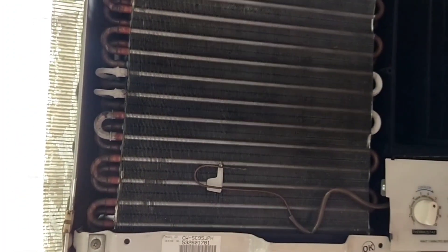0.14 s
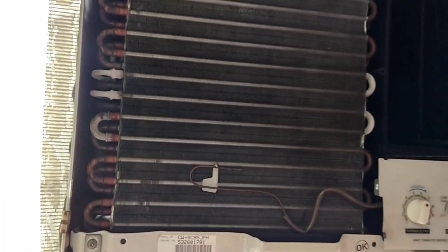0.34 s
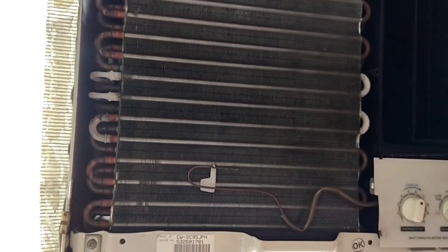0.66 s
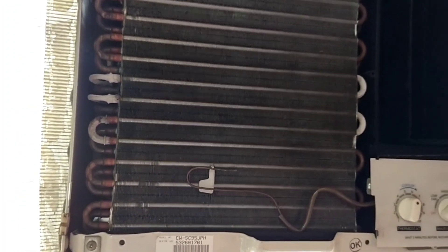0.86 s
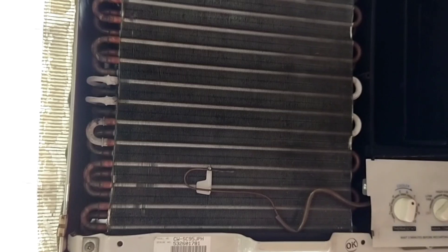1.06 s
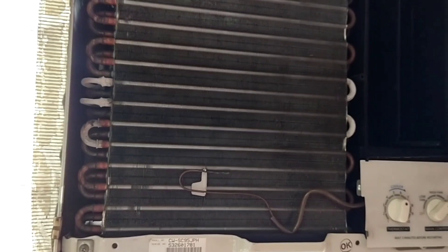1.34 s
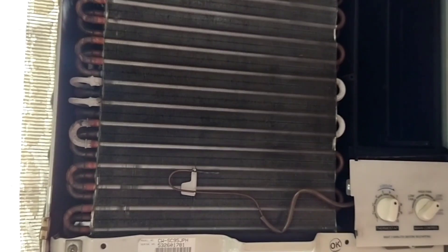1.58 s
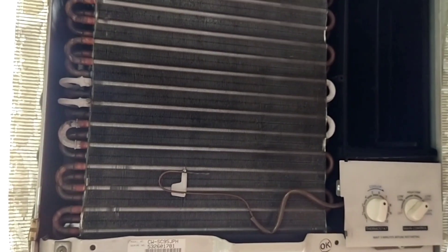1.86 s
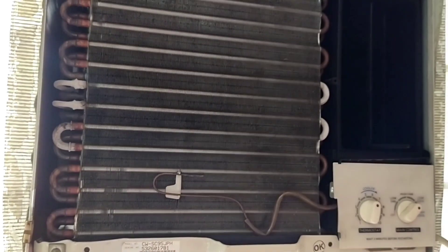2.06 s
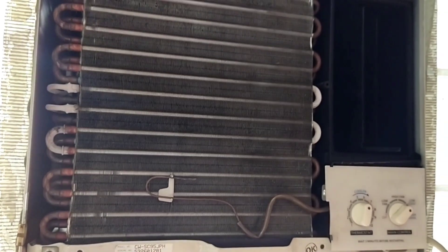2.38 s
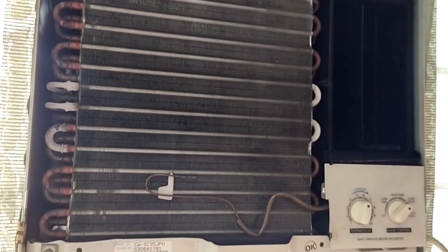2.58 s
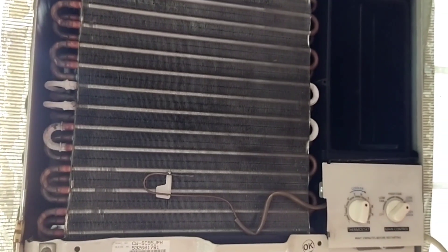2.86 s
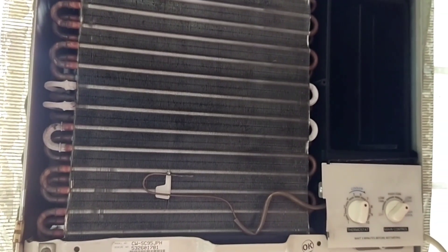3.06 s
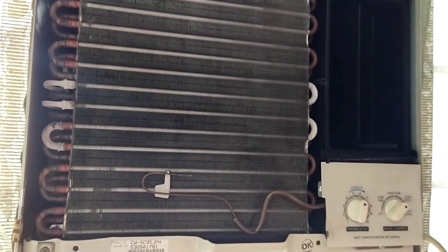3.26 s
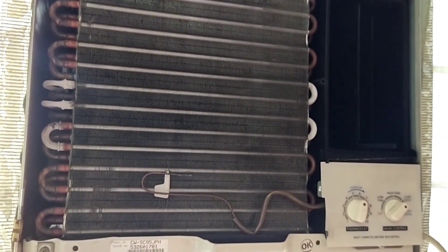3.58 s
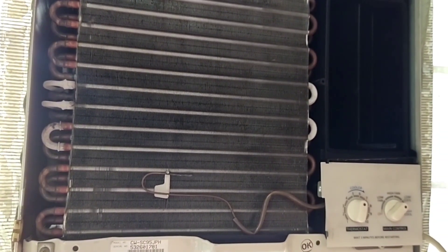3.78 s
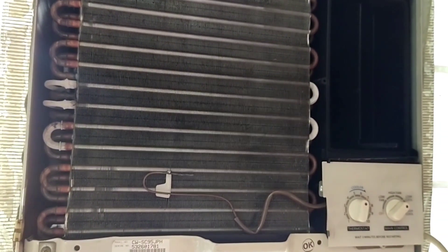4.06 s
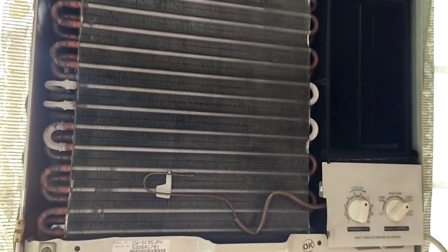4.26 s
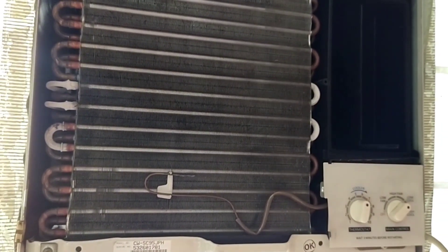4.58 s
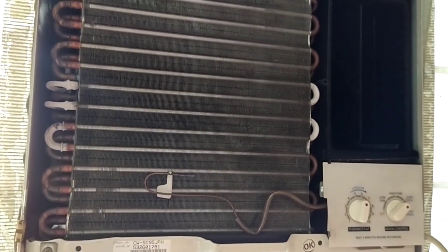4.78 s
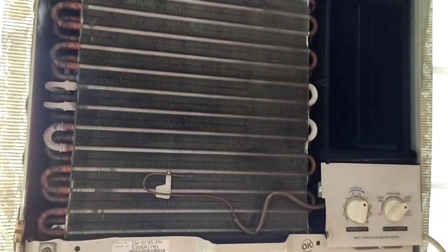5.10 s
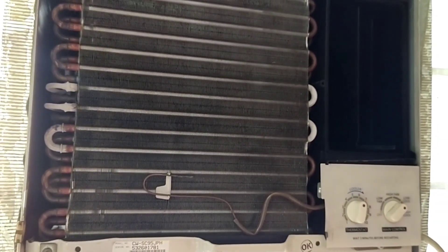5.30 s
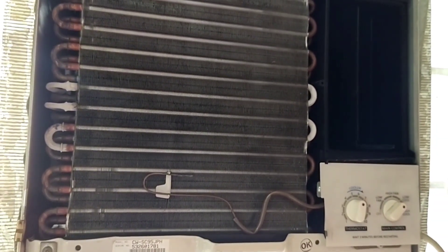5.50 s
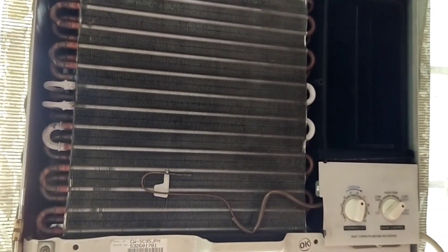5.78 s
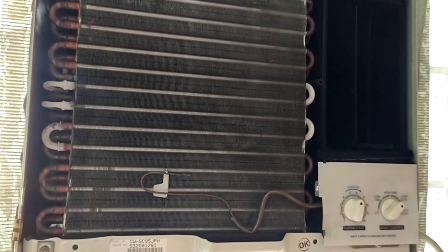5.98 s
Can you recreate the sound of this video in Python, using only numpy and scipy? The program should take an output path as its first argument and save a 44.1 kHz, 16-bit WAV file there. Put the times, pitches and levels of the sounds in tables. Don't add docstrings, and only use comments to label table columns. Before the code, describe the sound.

A window air conditioner hums close by, its low compressor drone pulsing about three times a second under airy fan roar, with a few small ticks.

```python
import sys
import numpy as np
from scipy import signal
from scipy.fft import irfft, next_fast_len
from scipy.io import wavfile
from scipy.ndimage import uniform_filter1d

SR = 44100
rng = np.random.default_rng(int(sys.argv[2]) if len(sys.argv) > 2 else 0)


def generate_wav(sig):
    pcm = np.round(np.clip(np.atleast_2d(sig).T, -1, 1) * 32767).astype(np.int16)
    wavfile.write(sys.argv[1], SR, pcm)


def voltage_ratio(decibels):
    exponent = np.asarray(decibels, float) / 20
    return 10 ** exponent


N = 270789

MAINS_HZ, FAN_HZ = 119.68, 14.89
FIRST_DIP_S = 0.083
TOP_MULTIPLE = 30
FAINT_DB, FAINT_DB_PER_MULTIPLE, FAINT_SCATTER_DB = -78, -.25, 3
RIGHT_PANEL, RIGHT_PANEL_LAG_S = (4, 5), .00045
ROCKING_PANEL, OPPOSED_RAD = (7, 24, 25, 28), 2.2
SCATTER_RAD_PER_MULTIPLE = .02
MASK_FROM_HZ, MASK_DB, MASK_DB_PER_OCTAVE = 2000, 7.5, -2.3
EDGE_HZ = 15520

# (time [s], shaft speed [Hz])
SHAFT_SPEED = [(0, 58.312), (6.14, 58.25)]
# (multiple of the shaft [1], left level [dB], right level [dB])
SHELL_TONES = [(1, -62.5, -61.2), (2, -48.8, -48.1), (3, -55, -56.5), (4, -48.2, -49.7), (5, -73.0, -70.5),
               (6, -66.7, -64.6), (7, -73.8, -75.7), (8, -64.2, -61.9), (9, -62.4, -60.1),
               (10, -69.2, -70.3), (12, -70.3, -73.1), (13, -65.2, -76.0), (14, -80.6, -72.7),
               (17, -76.7, -76.4), (18, -75, -70.2), (24, -69.2, -74.7), (25, -71.9, -79.8),
               (26, -68.3, -76.9), (27, -84.4, -77.2), (28, -76.2, -82.8)]
# (multiple of the hum [1], level [dB])
MAINS_HUM = [(1, -49.3), (2, -62)]
# (multiple of the fan shaft [1], level [dB])
BLADE_TONES = [(5, -67.5), (9, -59), (13.655, -66), (13.742, -68)]
# (shell multiple [1], level [dB])
ROCKING_TONES = [(2, -68), (3, -69), (5, -74), (7, -75), (9, -75), (11, -73)]
# (shell multiple [1], times the mains hum added [1], level [dB])
SLIP_TONES = [(6, 1, -72), (10, -1, -75)]
# (share of a turn [1], level [dB])
VALVE_CLICKS = [
    (.27, -81),
    (.77, -67),
    (0.963, -80),
]
# (frequency [Hz], density [dB per Hz])
ROAR_SPECTRUM = [(20, -100), (60, -95), (80, -80), (110, -78), (230, -77.5), (310, -84.5), (332, -88.5),
                 (360, -81.5), (700, -86), (880, -90.5), (1120, -87.5), (1300, -92.5), (1800, -95),
                 (3000, -115)]
# (frequency [Hz], width [Hz], density [dB per Hz])
PANEL_MODES = [(114, 12, -77), (128, 20, -72), (168, 16, -76), (204, 14, -74), (240, 20, -78),
               (280, 20, -79), (435, 20, -78), (468, 18, -75), (522, 26, -78), (580, 16, -79),
               (650, 30, -81.5), (757, 30, -84), (815, 18, -84), (975, 20, -88)]
# (frequency [Hz], left-right likeness [1])
LIKENESS = [(60, .96), (150, .965), (210, .96), (330, .84), (500, .94), (770, .66), (1170, .14), (1800, 0)]
# (frequency [Hz], left over right [dB])
BALANCE = [(60, -1), (140, 0), (220, 1), (360, -2.5), (520, -2.5), (750, 1), (870, -3), (1150, 1.5),
           (1800, 0)]
# (frequency [Hz], lead of the left microphone [rad])
LEFT_PHASE = [(100, 0), (170, -.05), (290, -.2), (350, .1), (470, -.2), (650, .1), (760, -.35), (1000, -.6)]
# (frequency [Hz], left density [dB per Hz], right density [dB per Hz])
FIN_HISS = [(1500, -107, -107), (2200, -95.5, -94.5), (2700, -97.5, -98), (3200, -101.5, -101),
            (3900, -102.5, -103.5), (4300, -99, -103), (4700, -100, -107.5), (5400, -104, -113),
            (5900, -107.5, -113), (6300, -104.5, -108.5), (7000, -102.5, -107), (7400, -102, -108),
            (8200, -104.5, -114), (10400, -108.5, -117.5), (11700, -113.5, -117), (12300, -112, -118),
            (14400, -116, -120.5), (15500, -112, -131)]
# (time [s], hiss level [dB])
FIN_NEARNESS = [(0, 1.2), (1.4, 1), (2.5, .3), (5.2, -.7), (6.14, -.5)]
# (time [s], share turned away [1])
TURNING = [(0, -.5), (2.15, -.4), (2.3, .8), (3.5, 1), (4.7, 0), (5.1, 1), (5.6, .7), (6.14, .3)]
# (frequency [Hz], level [dB])
TURNED_LOSS = [(8000, 0), (12000, -2), (15500, -2.5)]
# (multiple [1], left level [dB], right level [dB])
SINGING_TONES = [(21, -77, -82), (29, -80, -80), (41, -85, -85), (63, -84, -82), (69, -87, -91),
                 (71, -89, -87), (72, -87, -91), (74, -85, -92), (75, -85, -89), (76, -82.5, -86),
                 (83, -89, -94), (80, -88.5, -95), (90, -89.5, -97), (116, -92, -93), (126, -88, -95),
                 (133, -87.5, -96), (134, -88, -96)]
# (start [s], end [s], frequency [Hz], width [Hz], level [dB])
WHISTLE_MODES = [
    (-.8, 1.3, 4320, 70, -77),
    (-.6, 2.1, 7820, 180, -76),
    (5.5, 6.3, 8550, 150, -83),
]
# (time [s], peak level [dB], brightness [Hz], left over right [dB])
TICK_EVENTS = [
    (1.06862, -26.6, 1150, 33),
    (2.1302, -48.5, 9500, 10),
    (2.75, -56, 7500, 6),
    (4.705, -58, 8800, 6),
    (5.703, -59, 10300, 10),
    (5.72, -58, 10300, 10),
    (6.06, -58, 10000, 8),
    (6.0953, -47.5, 9000, 16),
]
# (start [s], end [s], low edge [Hz], high edge [Hz], left level [dB], right level [dB])
HAND_RUB = (2.71, 2.85, 3500, 9000, -67.5, -70)


def read(points, hz):
    f, value = np.transpose(points)
    return np.interp(np.log(hz + 1), np.log(f + 1), value)


def curve(points):
    return np.interp(np.arange(N) / SR, *np.transpose(points))


def evened(x):
    return x / np.sqrt(np.mean(x ** 2))


def drift(hz, depth_db):
    knots = evened(uniform_filter1d(rng.standard_normal(200), size=4))
    return np.interp(np.arange(N) / SR * hz * 4, np.arange(200), voltage_ratio(depth_db * knots))


def swelling(start, end, t):
    return np.sin(np.pi * np.clip((t - start) / (end - start), 0, 1))


def resonance(x, hz, q):
    return signal.lfilter(*signal.iirpeak(hz, q, SR), x)


def tone(turns, db, waver_db):
    return np.sqrt(2) * voltage_ratio(db) * drift(1.18, waver_db) * np.cos(2 * np.pi * turns)


def noise(left_db, right_db, same, left_lead=0):
    size = next_fast_len(N)
    a, b, c, d = rng.standard_normal((4, size // 2 + 1))
    left = a + 1j * b
    right = same * left * np.exp(-1j * left_lead) + np.sqrt(1 - same ** 2) * (c + 1j * d)
    spectra = np.array([left * voltage_ratio(left_db), right * voltage_ratio(right_db)])
    return irfft(spectra * np.sqrt(size * SR / 4), size)[:, :N]


def compressor(turns):
    out, turn, power = np.zeros((2, N)), np.exp(2j * np.pi * turns), 1
    strong = {k: (left_db, right_db) for k, left_db, right_db in SHELL_TONES}
    for k, chance in enumerate(rng.standard_normal((TOP_MULTIPLE, 3)), 1):
        power = power * turn
        faint_db = FAINT_DB + FAINT_DB_PER_MULTIPLE * k + FAINT_SCATTER_DB * chance[:2]
        db = strong.get(k, faint_db)
        lead = SCATTER_RAD_PER_MULTIPLE * k * chance[2] + OPPOSED_RAD * (k in ROCKING_PANEL)
        lead -= 2 * np.pi * k * SHAFT_SPEED[0][1] * RIGHT_PANEL_LAG_S * (k in RIGHT_PANEL)
        start = 2 * np.pi * rng.random() * (k != 2)
        phase = start + lead * np.array([[.5], [-.5]])
        sides = voltage_ratio(np.reshape(db, (2, 1))) * np.exp(1j * phase)
        out += np.sqrt(2) * drift(1.0, .5 + .03 * k) * (sides * power).real
    return out


def motors(turns):
    t = np.arange(N) / SR
    dip = round(FIRST_DIP_S * SR)
    mains = MAINS_HZ * (t - t[dip]) + 2 * turns[dip] + .5
    fan = FAN_HZ * t + .03 * drift(.6, 1.0)
    hum = sum(tone(k * mains, db, 1.3) for k, db in MAINS_HUM)
    blades = sum(tone(k * fan + rng.random(), db, 2.0) for k, db in BLADE_TONES)
    rocking = sum(tone(k * turns + fan + rng.random(), db, 1.6) for k, db in ROCKING_TONES)
    return hum + blades + rocking


def slip(turns):
    mains = MAINS_HZ * np.arange(N) / SR
    return sum(tone(k * turns + side * mains + rng.random(), db, 1.4) for k, side, db in SLIP_TONES)


def valves(turns):
    out, t = np.zeros((2, N)), np.arange(500) / SR
    for share, db in VALVE_CLICKS:
        at = np.flatnonzero(np.diff(np.floor(turns - share)) > 0)
        clicks = np.zeros(N)
        clicks[at] = voltage_ratio(db + 2.7 * rng.standard_normal(400)[:len(at)])
        modes = rng.standard_normal((2, 500)) * voltage_ratio(-60 * t / .012)
        ring = resonance(resonance(modes, 4400, 3.0), 4300, 4.0)
        ring += .4 * resonance(modes, 7400, 6.0)
        out += signal.oaconvolve(clicks[None], ring * voltage_ratio([[16.5], [12]]), axes=1)[:, :N]
    return out


def roar():
    hz = np.fft.rfftfreq(next_fast_len(N), 1 / SR)
    power = voltage_ratio(read(ROAR_SPECTRUM, hz)) ** 2
    for mode_hz, width, db in PANEL_MODES:
        power = power + voltage_ratio(db) ** 2 / (1 + (2 * (hz - mode_hz) / width) ** 2) ** 2
    db, tilt_db = 10 * np.log10(power), read(BALANCE, hz) / 2
    return noise(db + tilt_db, db - tilt_db, read(LIKENESS, hz), read(LEFT_PHASE, hz))


def hiss(turns):
    hz, table = np.fft.rfftfreq(next_fast_len(N), 1 / SR), np.array(FIN_HISS)
    below_db = -40 * np.log10(1 + (900 / (hz + 1)) ** 2)
    air = noise(read(table[:, [0, 1]], hz) + below_db, read(table[:, [0, 2]], hz) + below_db, 0)
    z = signal.stft(air, nperseg=512, noverlap=384)[2]
    patches = uniform_filter1d(rng.standard_normal(z.shape), size=30, axis=2)
    patches = evened(uniform_filter1d(patches, size=5, axis=1))
    gusts = evened(uniform_filter1d(rng.standard_normal(z.shape[2]), size=6))
    turned = np.interp(np.arange(z.shape[2]) * 128 / SR, *np.transpose(TURNING))
    far_db = read(TURNED_LOSS, np.fft.rfftfreq(512, 1 / SR))[:, None] * turned
    z = z * voltage_ratio(1.6 * patches + .6 * gusts + far_db)
    air = signal.istft(z, nperseg=512, noverlap=384)[1][:, :N]
    throb_db = .5 * np.cos(2 * np.pi * (turns - .27))
    return air * voltage_ratio(-.4 + curve(FIN_NEARNESS) + throb_db)


def singing(turns):
    out = np.zeros((2, N))
    for k, *sides_db in SINGING_TONES:
        out += np.array([tone(k * turns + rng.random(), db, 2.5) for db in sides_db])
    return out


def whistles(turns):
    out, t = np.zeros((2, N)), np.arange(N) / SR
    clicks = evened(np.diff(np.floor(turns - VALVE_CLICKS[0][0]), prepend=0).clip(0))
    for start, end, hz, width, db in WHISTLE_MODES:
        band = resonance(rng.standard_normal(N) + clicks, hz, hz / width)
        out += voltage_ratio([[db], [db - 12]]) * evened(band) * swelling(start, end, t)
    return out


def ticks():
    out, t = np.zeros((2, N + 4000)), np.arange(4000) / SR
    rise = 1 - np.exp(-(t / .00026) ** 2)
    partials = [(2200, .24), (3800, .27), (6900, .34), (9700, .12), (14000, .04)]  # (Hz, strength)
    edge = sum(part * np.sin(2 * np.pi * f * t) for f, part in partials) * np.exp(-t / .00042) * rise
    room = signal.butter(2, [3000, 7800], "band", fs=SR)
    for s, db, hz, left_db in TICK_EVENTS:
        decay = np.exp(-t / .00075 * np.sqrt(hz / 1100))
        swing = -np.sin(2 * np.pi * hz * t) * decay * np.minimum(3.1 * hz * t, 1) ** 2
        tail = signal.lfilter(*room, rng.standard_normal((2, 4000)))
        tail *= voltage_ratio(-31 - 60 * t / .11)
        at = round(s * SR)
        right = voltage_ratio(-left_db) * swing + .2 * edge + .7 * tail[1]
        out[0, at:at + 4000] += voltage_ratio(db + 9) * (swing + edge + tail[0])
        out[1, at + 12:at + 4000] += voltage_ratio(db + 6) * right[:-12]
    return out[:, :N]


def rustle():
    start, end, low_hz, high_hz, *sides_db = HAND_RUB
    swell = swelling(start, end, np.arange(N) / SR) ** .5
    grain = voltage_ratio(3 * evened(uniform_filter1d(rng.standard_normal(N), size=400)))
    band = signal.butter(2, [low_hz, high_hz], "band", fs=SR)
    rub = signal.lfilter(*band, rng.standard_normal((2, N)) * grain)
    return voltage_ratio(np.reshape(sides_db, (2, 1))) * evened(rub) * swell


def scene():
    turns = np.cumsum(curve(SHAFT_SPEED)) / SR + .01 * drift(3.0, 1.0)
    machine = compressor(turns) + motors(turns) + slip(turns) + valves(turns)
    air = roar() + hiss(turns)
    shell = singing(turns) + whistles(turns)
    return machine + air + shell + ticks() + rustle()


def top_cut(x):
    return signal.sosfilt(signal.butter(12, 15520, fs=SR, output="sos"), x)


def record(dry):
    hz, _, z = signal.stft(dry, SR, nperseg=2048)
    band = uniform_filter1d(uniform_filter1d(abs(z) ** 2, size=6, axis=1), size=3, axis=2)
    around = uniform_filter1d(band.mean(0), size=120, axis=0)
    around = np.exp(uniform_filter1d(np.log(around + 1e-30), size=20, axis=1))
    mask_db = MASK_DB + MASK_DB_PER_OCTAVE * np.log2((hz + 1) / MASK_FROM_HZ)
    heard = band > around * voltage_ratio(-mask_db)[:, None] ** 2
    kept = heard | (hz < MASK_FROM_HZ)[:, None]
    gated = signal.istft(z * kept, SR, nperseg=2048)[1][:, :N]
    lowpass = signal.firwin(1023, EDGE_HZ, window=("kaiser", 9), fs=SR)
    limited = signal.oaconvolve(gated, lowpass[None], "same")
    return top_cut(limited)


dry = scene()
out = record(dry)
generate_wav(out)
```